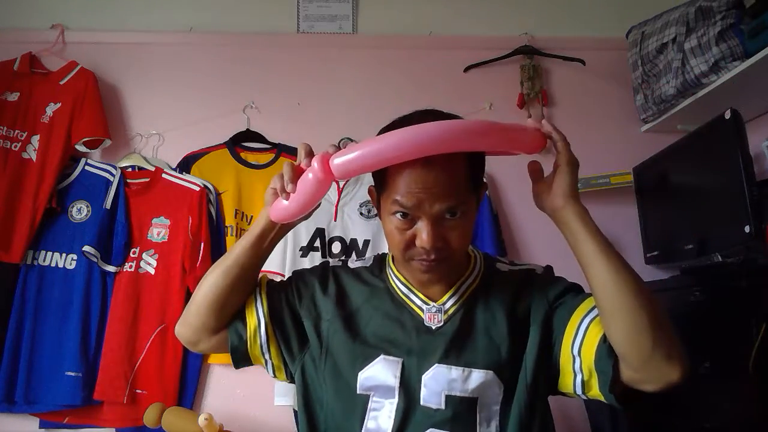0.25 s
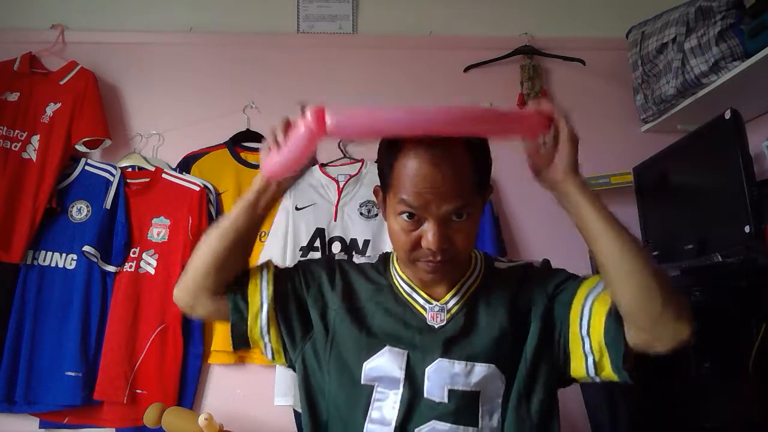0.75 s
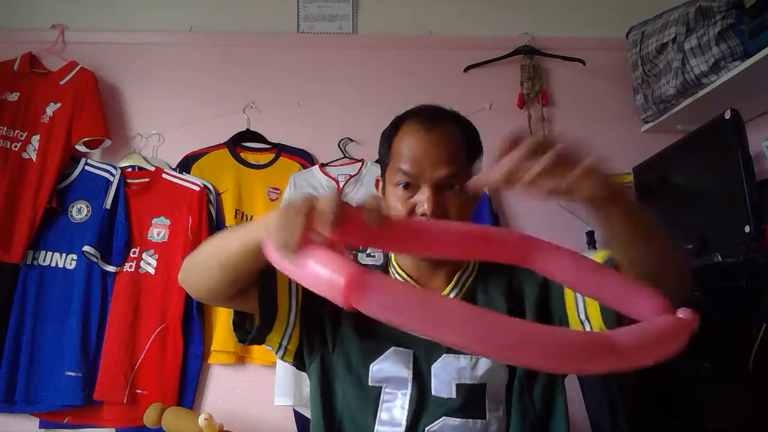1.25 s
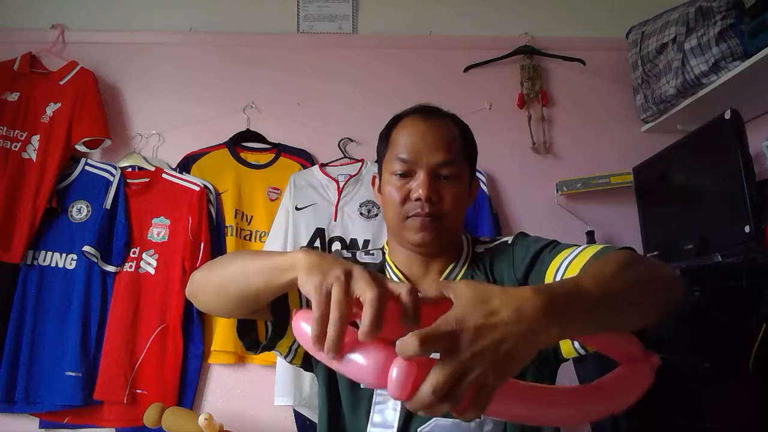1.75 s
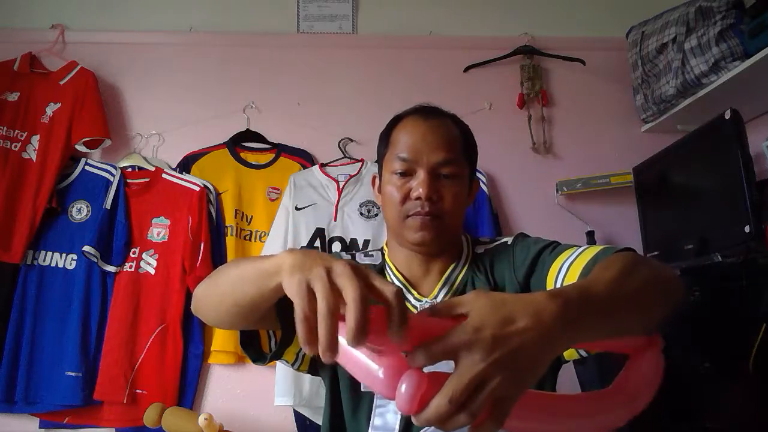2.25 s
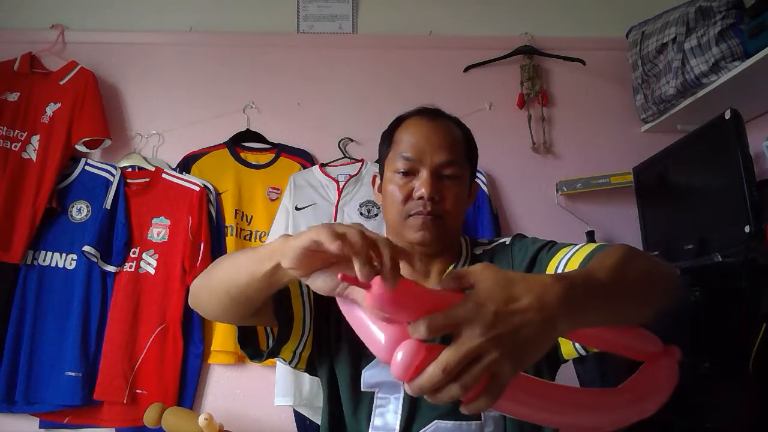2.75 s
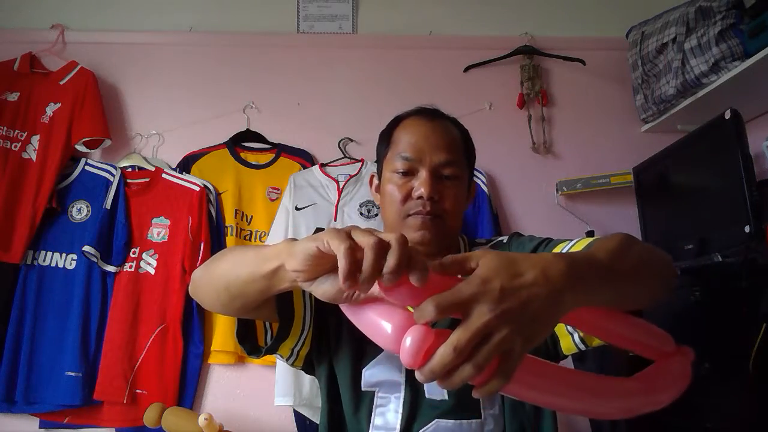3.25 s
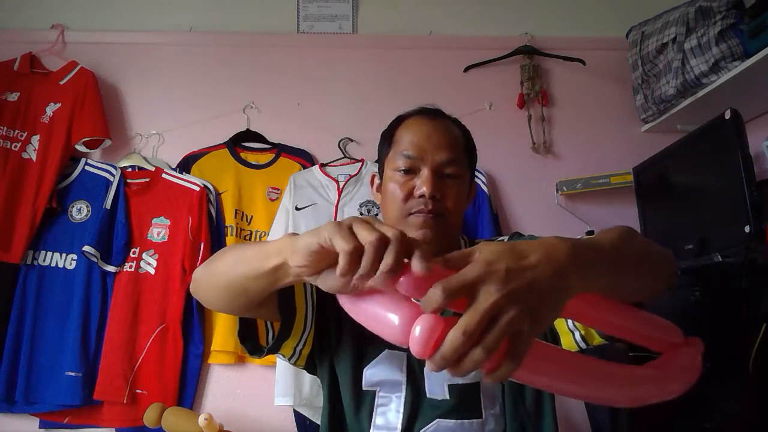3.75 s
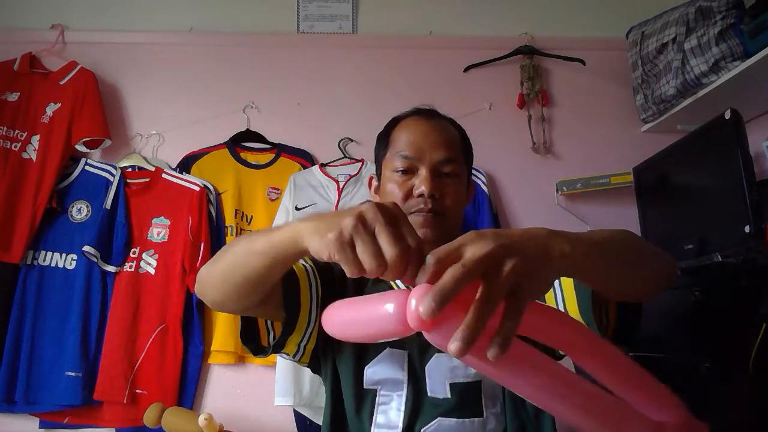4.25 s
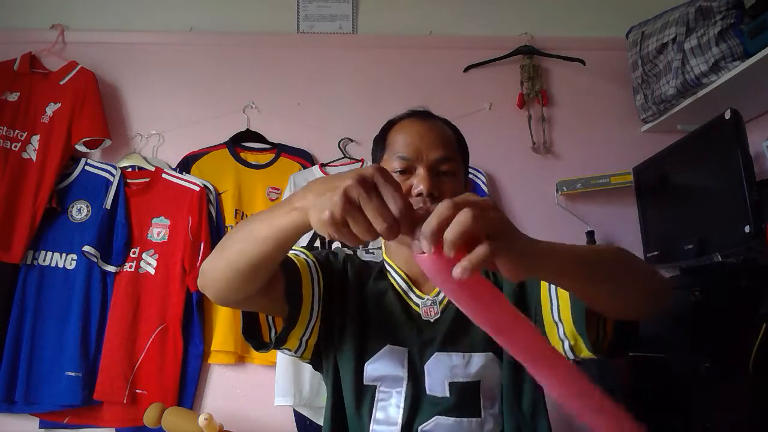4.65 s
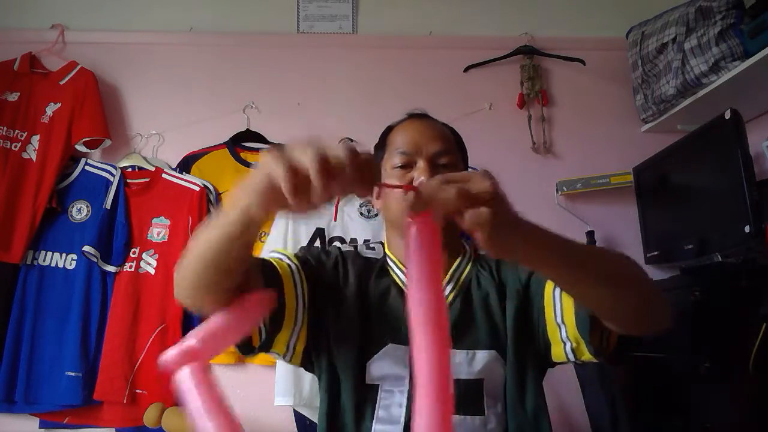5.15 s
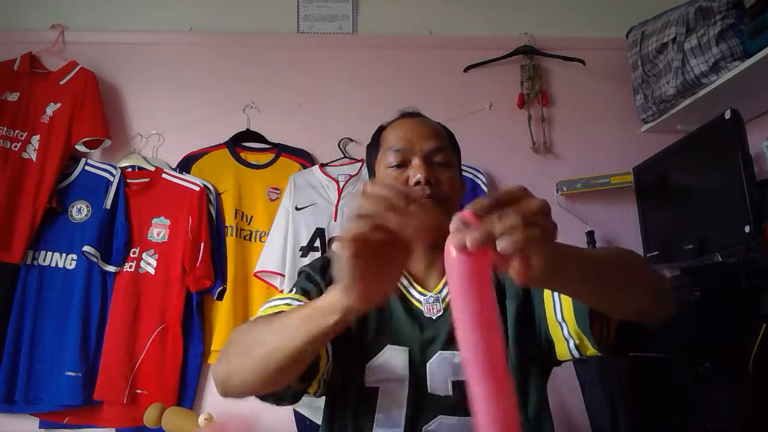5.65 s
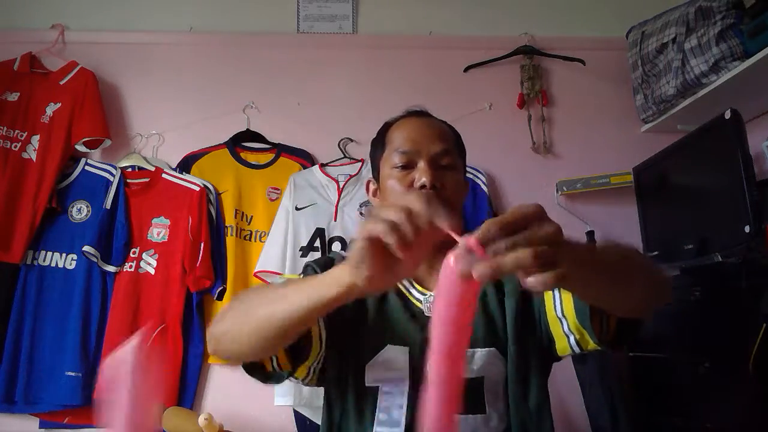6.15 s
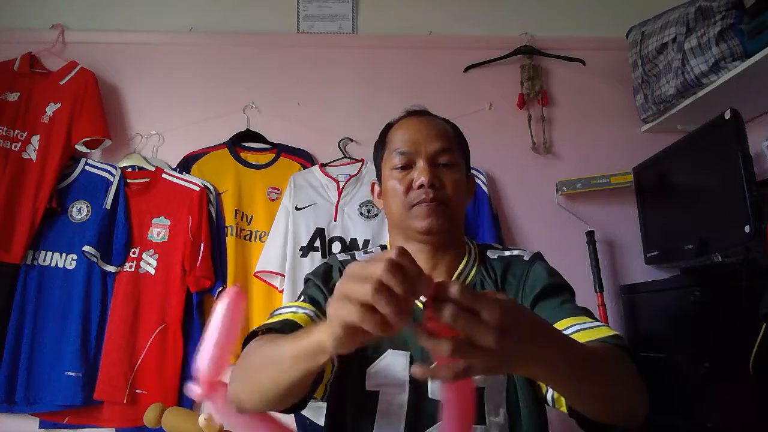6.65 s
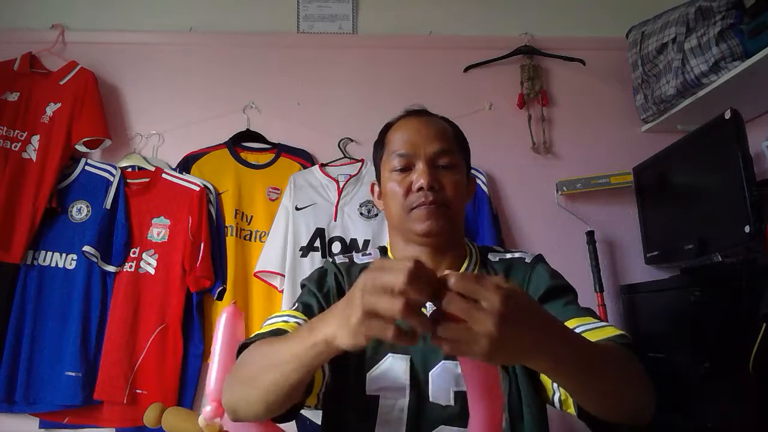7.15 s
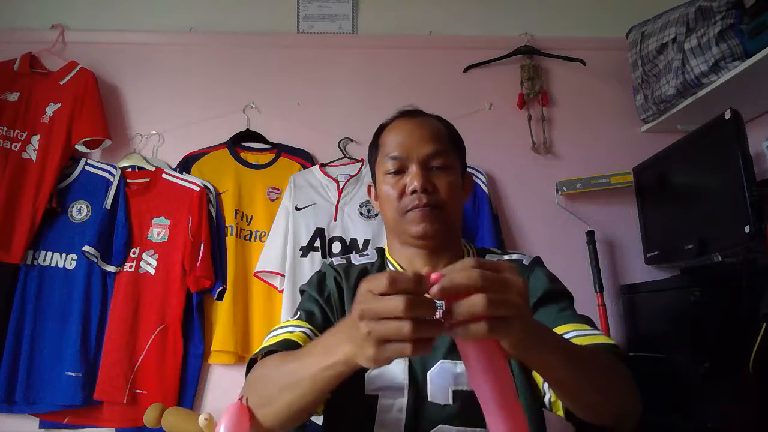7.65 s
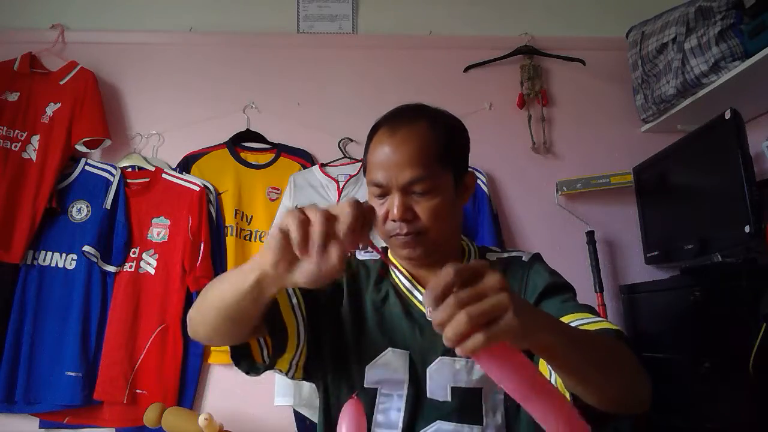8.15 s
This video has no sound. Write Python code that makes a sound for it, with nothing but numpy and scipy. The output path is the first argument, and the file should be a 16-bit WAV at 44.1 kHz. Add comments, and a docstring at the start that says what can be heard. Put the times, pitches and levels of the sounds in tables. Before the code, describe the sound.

A modelling balloon brushes off a man's hair with two main hissy swishes and bright snaps. Then hands twist and pinch it: short stuttering creaks, isolated rubbery snaps, soft fingertip friction and a few low thuds. One clear, brief squeak stands out around six seconds. Close stereo microphone, small room with short reflections and very faint low room noise.

```python
"""Crisp snaps and swishes open the scene, then dry creaks, squeaks and thin tones over soft fingertip friction and low thuds.
A latex balloon is slid off a head, then twisted and pinched by hand in a small room, close to a stereo microphone.
Latex sticks and slips: each slip thumps the air chamber, rings the taut skin and snaps; runs of slips make creaks.
The swishes over hair are coloured noise; the thin tones are nearly pure, wavering sines, one of them a faint low hum.
The air in the tube rings on briefly, held bubbles lend their resonances, and the room answers."""
import sys
import numpy as np
from scipy import signal
from scipy.fft import rfft, irfft, next_fast_len
from scipy.io import wavfile

SR = 44100
rng = np.random.default_rng(int(sys.argv[2]) if len(sys.argv) > 2 else 0)


def file_out(sig):
    """Save sig as 16-bit WAV at sys.argv[1]."""
    # one column per channel
    cols = np.atleast_2d(sig).T
    # limit, then scale
    lim = np.clip(cols, -1, 1)
    pcm = np.round(lim * 32767).astype(np.int16)
    wavfile.write(sys.argv[1], SR, pcm)


N = 369999
TIME = np.arange(N) / SR

# Colour of the still room. Each row: frequency in Hz, relative level in dB per Hz.
AIR_COLOUR = [(30, 14), (320, -5), (1500, -28), (16000, -26)]
# Decay of the room. Each row: frequency in Hz, t60 in seconds.
ROOM_DECAY = [(150, 0.27), (800, 0.17), (14000, 0.085)]
# Resonances of the air in the tube. Each row: frequency in Hz, relative level in dB, t60 in seconds.
TUBE_MODES = [(338, 4, 0.27), (468, -1.5, 0.22), (881, -0.5, 0.047), (1442, -9.5, 0.034)]
# Low thuds of the hands on the balloon. Each row: start in seconds, pitch in Hz, level in dB.
HAND_THUDS = [(0.0, 201.5, -30.5), (4.276, 107, -31.5), (4.419, 113, -41), (6.47, 182, -29),
              (6.54, 58.3, -42), (7.09, 153, -36.5), (7.152, 148.5, -37.5)]
# Swishes over hair. Each row: loudest moment in seconds, half length in seconds, level in dB.
HAIR_SWISHES = [(0.029, 0.098, -21), (0.258, 0.073, -35.5), (0.587, 0.052, -35), (0.816, 0.063, -22.5),
                (1.05, 0.052, -33.5)]
# Colour of the swishes. Each row: frequency in Hz, relative level in dB per Hz.
SWISH_COLOUR = [(60, 3), (190, -14.5), (700, -28.5), (1800, -9), (7000, -10), (10000, -5.5), (16000, -3)]
# Short squeaks and one faint low hum. Each row: loudest moment in seconds, half length in seconds,
# centre pitch in Hz, level in dB.
THIN_TONES = [(0.895, 0.03, 1086, -50), (2.05, 0.45, 134.4, -53), (2.355, 0.022, 1220, -44),
              (4.036, 0.01, 2510, -36), (4.862, 0.066, 1220, -49), (2.094, .006, 2000, -38),
              (3.868, .017, 1520, -52), (6.068, .01, 1450, -15), (7.033, .007, 2250, -42)]
# Holds of the hands, each closing off one bubble. Each row: start in seconds, end in seconds,
# centre chamber pitch in Hz, snap level in dB relative to the skin, relative level of creeping fingertips in dB.
HAND_HOLDS = [(0, 0.268, 1050, -3.5, -33.5), (0.682, 1.08, 416, -1.5, -53), (1.412, 1.669, 470, -5, -51.5),
              (1.666, 1.91, 860, -6.5, -42.5), (1.88, 2.117, 540, 1.5, -44.5), (2.12, 2.768, 744, -1, -47),
              (2.84, 2.978, 920, -2, -32.5), (3.06, 3.43, 710, -11.5, -57.5), (3.483, 3.71, 870, -17, -37),
              (3.773, 3.904, 750, -11, -47.5), (3.884, 4.285, 780, -8, -36), (4.27, 4.65, 380, 2, -44.5),
              (4.673, 5.216, 613, -3.5, -45), (5.247, 5.457, 386, 4, -43.5),
              (5.521, 5.605, 606, -28, -32.5), (5.871, 6.01, 480, -9.5, -38), (6.014, 6.135, 810, 0, -34.5),
              (6.194, 6.393, 690, -4.5, -33.5), (6.415, 6.545, 570, -4, -35.5),
              (6.608, 7.03, 555, 6, -52.5), (7.062, 7.188, 710, -16, -49.5), (7.372, 7.71, 1004, -2.5, -48),
              (7.82, 7.9, 585, -20, -59), (7.95, 8.31, 1080, -6.5, -43)]
# Colour of the creeping fingertips. Each row: frequency in Hz, relative level in dB per Hz.
FINGER_COLOUR = [(120, -3.5), (350, -6.5), (900, -11.5), (2200, -8.5), (5000, -13), (15000, -13.5)]
# Lightly held bubbles ringing with the slips. Each row: start in seconds, end of the drive in seconds,
# centre resonance in Hz, level in dB.
BUBBLE_RINGS = [(1.669, 1.808, 952, -33.5), (1.759, 1.884, 351, -39), (1.882, 1.92, 476, -29),
                (1.916, 1.957, 357, -27), (2.273, 2.325, 2600, -53), (2.53, 2.533, 636, -20),
                (2.687, 2.711, 723, -30.5), (3.35, 3.654, 1896, -45.5), (5.118, 5.206, 4460, -41),
                (5.137, 5.223, 2920, -41.5), (5.21, 5.273, 3400, -50), (6.247, 6.313, 2080, -29.5),
                (6.533, 6.58, 1990, -34.5), (6.606, 6.68, 2300, -37.5), (7.381, 7.41, 3750, -34),
                (7.95, 7.975, 2450, -35.5)]
# Single slips as a finger or a twist lets go. Each row: time in seconds, centre skin pitch in Hz,
# chamber level in dB, skin level in dB.
LONE_SLIPS = [(0.031, 3300, -22.5, -16.5), (0.119, 2000, -21.5, -24), (0.212, 3280, -29.5, -19),
              (1.001, 1800, -29.5, -28.5), (1.511, 2430, -25.5, -33), (1.589, 1010, -29, -61),
              (1.6684, 1560, -12.5, -14.5), (1.739, 1830, -16, -11.5), (1.9735, 1610, -27, -26),
              (2.0152, 1490, -18.5, -17.5), (2.146, 1330, -24.5, -41), (2.356, 2600, -31.5, -33),
              (2.3735, 2550, -31, -30), (2.398, 2590, -30, -28), (2.408, 2530, -26, -23.5),
              (2.655, 3930, -19, -17.5), (2.875, 2750, -22, -26), (3.1181, 2230, -19, -15),
              (3.271, 1880, -34, -52), (3.34, 1830, -36.5, -70), (3.417, 2100, -36.5, -60),
              (3.928, 2100, -52, -19), (3.944, 2050, -34, -16.5), (3.9786, 1900, -44, -24.5),
              (4.0648, 2420, -50, -22), (4.0733, 3600, -20, -12.5), (4.205, 2330, -22.5, -23),
              (4.281, 2070, -20.5, -21.5), (4.416, 1980, -14, -17), (4.668, 2160, -32, -13),
              (4.674, 1940, -26.5, -17.5), (5.084, 3900, -67, -37), (5.2928, 4850, -32, -25.5),
              (5.36, 1830, -23, -60), (5.4153, 4340, -26.5, -25), (5.865, 2100, -25, -38),
              (5.973, 2000, -57, -21.5), (6.3297, 4260, -52, -15), (6.3842, 2170, -36, -12.5),
              (6.9867, 6040, -27, -27), (7.033, 2100, -33.5, -57.5), (7.0897, 1605, -21.5, -17),
              (7.152, 1720, -22, -17.5), (7.4596, 4320, -31, -22), (7.5488, 2200, -16, -8),
              (7.7023, 2070, -54, -24.5), (7.862, 890, -21, -28.5), (7.983, 3610, -32, -9.5),
              (8.004, 2470, -14.5, -11), (8.173, 3200, -31, -23)]
# Twists that creak. Each row: start in seconds, end in seconds, middle rate in slips per second,
# centre skin pitch in Hz, chamber level in dB, skin level in dB, swell from start to end in dB, unevenness 0-1.
TWIST_CREAKS = [(0.712, 0.791, 145, 1810, -44, -48.5, -8, 0.11),
                (1.624, 1.658, 380, 1840, -34, -32.5, -4, 0.35),
                (1.681, 1.801, 220, 1850, -29.5, -26.5, 1, 0.33),
                (1.795, 1.891, 150, 1850, -33, -37.5, -7.5, 0.21),
                (1.901, 1.958, 260, 2200, -22, -26, 3, 0.16),
                (1.988, 1.997, 233, 1780, -19.5, -21.5, -1, .01),
                (2.128, 2.185, 200, 2000, -42.5, -40.5, -6.5, 0.26),
                (2.278, 2.314, 173, 2670, -42, -41.5, 1, 0.28),
                (2.417, 2.464, 230, 2340, -30, -31.5, 1, 0.34),
                (2.525, 2.546, 178, 2260, -27.5, -30, -9, 0.14),
                (2.599, 2.645, 240, 2390, -31, -26, -2.5, 0.18),
                (2.687, 2.749, 139, 2900, -31.5, -37, -7.5, 0.16),
                (2.851, 2.884, 125, 2880, -37, -44, 6, 0.17),
                (2.888, 2.911, 420, 1750, -21.5, -20.5, 0, 0.17),
                (2.913, 3.012, 129, 2270, -35.5, -33.5, -14, 0.08),
                (3.371, 3.526, 136, 2060, -50, -46.5, 9.5, 0.2),
                (3.586, 3.654, 160, 2150, -37, -34.5, -1, 0.26),
                (3.694, 3.73, 520, 1640, -25, -22, -10, 0.03),
                (4.0792, 4.127, 212, 2110, -30, -15.5, -1, 0.14),
                (4.132, 4.196, 100, 2150, -50.5, -27, -11, 0.07),
                (4.675, 4.701, 225, 2170, -37, -24, -6.5, 0.07),
                (4.796, 4.858, 237, 1920, -42, -39, 4, 0.26),
                (4.942, 4.998, 143, 2800, -47, -39, -13, 0.24),
                (5.13, 5.208, 104, 2800, -51.5, -48, 3.5, 0.09),
                (5.227, 5.257, 111, 3520, -36.5, -46.5, -5, 0.2),
                (5.53, 5.584, 171, 1740, -34, -29, 4, 0.17),
                (6.004, 6.045, 155, 1580, -38, -30.5, 4.5, 0.31),
                (6.0314, 6.057, 550, 2060, -25.5, -16, 0, 0.05),
                (6.058, 6.078, 750, 1880, -45.5, -15.5, -5.5, 0),
                (6.185, 6.22, 218, 2280, -39.5, -31.5, -2.5, 0.28),
                (6.238, 6.328, 300, 2000, -35.5, -30, 3, 0.24),
                (6.452, 6.508, 280, 2210, -27, -26.5, 1, 0.21),
                (6.527, 6.591, 244, 2320, -47, -31.5, -11, 0.27),
                (6.615, 6.69, 490, 2900, -85.5, -35, -6.5, 0.26),
                (6.74, 6.785, 450, 2980, -40.5, -35.5, 2, 0.37),
                (6.85, 6.876, 154, 3500, -35, -48, 7.5, 0.3),
                (7.407, 7.503, 177, 2760, -45, -32, 2.5, 0.24),
                (7.69, 7.745, 185, 3760, -53.5, -43.5, -3, 0.22),
                (7.961, 7.988, 420, 2920, -68, -37.5, 6.5, 0.32),
                (7.996, 8.031, 454, 2500, -26, -26, -10.5, 0.3),
                (8.049, 8.073, 306, 2880, -33, -27, 9, 0.2),
                (8.11, 8.149, 390, 2750, -42.5, -35.5, 3, 0.26),
                (8.224, 8.273, 86, 2350, -34.5, -28, -6, 0.13)]


def undb(db):
    """Turn decibels into gain."""
    return 10 ** (np.asarray(db) / 20)


def unit(x):
    """Scale a sound to rms 1."""
    return x / np.sqrt(np.mean(x ** 2))


def band(x, lo_hz, hi_hz, order=2):
    """Band-pass a sound without looking ahead."""
    edges = [lo_hz, min(hi_hz, SR / 2 - 1000)]
    return signal.sosfilt(signal.butter(order, edges, "band", fs=SR, output="sos"), x)


def colour(x, points):
    """Multiply the spectrum by a curve through (Hz, dB) points, then scale to rms 1."""
    hz, db = np.transpose(points)
    size = next_fast_len(N, real=True)
    bins = np.maximum(np.fft.rfftfreq(size, 1 / SR), 1)
    curve = undb(np.interp(np.log(bins), np.log(hz), db))
    return unit(irfft(rfft(x, size) * curve, size)[:N])


def add(out, sound, start_s):
    """Mix a sound in at a time."""
    i = max(int(start_s * SR), 0)
    out[i:i + len(sound)] += sound[:max(N - i, 0)]


def air(level_db=-63, side_db=-13):
    """Faint room noise, mostly a low rumble, with a weaker part opposite in the two channels."""
    mid, side = (undb(level_db) * colour(rng.standard_normal(N), AIR_COLOUR) for _ in range(2))
    return mid + undb(side_db) * side * np.array([[1], [-1]])


def echoes(early_db=-9, early_t60_s=0.088, late_db=-11, apart_hz=2200):
    """Scatter from body and desk, then the walls; the close ports hear mainly the treble differently."""
    t = np.arange(SR // 2) / SR
    bins = np.fft.rfftfreq(len(t), 1 / SR)
    hz, t60 = np.transpose(ROOM_DECAY)
    mid, side = rfft(rng.standard_normal((2, len(t))))
    alike = np.exp(-(bins / apart_hz) ** 2)
    sides = np.array([[1], [-1]])
    field = mid * np.sqrt((1 + alike) / 2) + sides * side * np.sqrt((1 - alike) / 2)
    late = 0
    # crossfading bands, each with its own decay
    for share, decay in zip(np.eye(len(hz)), t60):
        weight = np.interp(np.log(bins + 1), np.log(hz), share)
        late = late + irfft(field * weight, len(t)) * np.exp(-np.log(1000) * t / decay)
    late = late * (t > .008)
    # the same noise reversed in time serves as a second, earlier pattern
    early = irfft(field, len(t))[:, ::-1] * np.exp(-np.log(1000) * t / early_t60_s) * (t > .001)
    return (undb(early_db) * unit(early) + undb(late_db) * unit(late)) / np.sqrt(len(t))


def room(x, left_lag=0.89, turns_per_s=0.3986):
    """Direct sound and echoes; as the balloon turns, it throws its sound along other paths."""
    turn = 2 * np.pi * turns_per_s * TIME
    wet = 0
    for share in (np.cos(turn), np.sin(turn)):
        wet = wet + signal.oaconvolve((x * share)[None], echoes(), axes=1)[:, :N]
    # the left port lies a fraction of a sample further away
    size = next_fast_len(N, real=True)
    delay = np.exp(-2j * np.pi * np.fft.rfftfreq(size) * left_lag)
    left = irfft(rfft(x, size) * delay, size)[:N]
    return np.array([left, x]) + wet


def shifting(x, decay_s, low_hz, rate=14, size=512, count=6):
    """Short echoes whose paths keep changing as the balloon turns and bends."""
    lag = np.arange(size) / SR
    out = 0
    for _ in range(count):
        echo = band(rng.standard_normal(size) * lag * np.exp(-lag / decay_s), low_hz, SR, order=1)
        # each path glides between normal and flipped polarity, with a new draw rate times a second
        share = np.interp(TIME * rate, np.arange(size), rng.choice([-1, 1], size))
        out = out + share * signal.oaconvolve(x, echo / np.linalg.norm(echo))[:N]
    return out / np.sqrt(count)


def ports(pair, side_db=-6):
    """Treble scatters off the moving hands, with opposite sign at the two ports."""
    scatter = shifting(pair[1], decay_s=0.00086, low_hz=3500)
    return pair + undb(side_db) * scatter * np.array([[1], [-1]])


def tube(x, ring_db=-2, low_hz=230):
    """The air column picks out its resonances and rings on; a thin balloon radiates little bass."""
    t = np.arange(SR // 2) / SR
    ring = 0
    for hz, db, t60 in TUBE_MODES:
        decay = np.log(1000) / t60
        mode = np.exp(-decay * t) * np.cos(2 * np.pi * hz * t)
        ring = ring + undb(db) * 2 * decay / SR * mode
    return band(x, low_hz, 11000, order=1) + undb(ring_db) * signal.fftconvolve(x, ring)[:N]


def bumps(rise_s=0.0091, rough=0.61):
    """A hand knocks or shoves the whole balloon: a low sine and noise around it swell and die as a soft thud."""
    out = np.zeros(N)
    t = np.arange(SR // 4) / SR
    for start, hz, db in HAND_THUDS:
        rumble = unit(band(rng.standard_normal(len(t)), hz / 2, 2 * hz))
        sway = np.sin(2 * np.pi * hz * t) + rough * rumble
        add(out, undb(db) * t / rise_s * np.exp(1 - t / rise_s) * sway, start)
    return out


def slide(grain_db=3):
    """Hairs brush the latex: a dense, slightly grainy hiss that swells and fades with each swish."""
    # the grain level is redrawn every 20 samples
    grain_level = np.repeat(rng.standard_normal(N // 20 + 1), 20)[:N]
    grains = rng.standard_normal(N) * undb(grain_db * grain_level)
    speed = sum(undb(db) * np.exp(-((TIME - centre) / half) ** 2) for centre, half, db in HAIR_SWISHES)
    return speed * colour(grains, SWISH_COLOUR)


def squeak(half, hz, db, waver, waver_rate=160, octave_db=-13):
    """An almost pure tone that swells, wavers, sags as much as it wavers, and dies."""
    t = np.arange(-2 * half, 2 * half, 1 / SR)
    drift = np.interp((t - t[0]) * waver_rate, np.arange(512), rng.standard_normal(512))
    phase = 2 * np.pi * np.cumsum(hz * np.exp(waver * (drift - t / half))) / SR
    voice = np.sqrt(2) * (np.sin(phase) + undb(octave_db) * np.sin(2 * phase))
    return undb(db) * np.exp(-(t / half) ** 2) * voice


def tones(waver=0.018, rough_s=0.021):
    """Thin tones; those with a half length above rough_s waver less in pitch the longer they are."""
    out = np.zeros(N)
    for centre, half, hz, db in THIN_TONES:
        add(out, squeak(half, hz, db, waver * min(rough_s / half, 1)), centre - 2 * half)
    return out


def pressure(attack_s=0.022, release_s=0.035):
    """The fingers close on the latex, hold, and ease off; the firmest hold counts."""
    holds = []
    for start, end, _, _, db in HAND_HOLDS:
        closing = np.clip((TIME - start) / attack_s, 0, 1)
        easing = np.exp(-np.maximum(TIME - end, 0) / release_s)
        holds.append(undb(db) * closing * easing)
    return np.max(holds, axis=0)


def creep(gain_db=-2, rate=420, spread_db=4.5, smear_s=.0028, rub=0.017, grip_db=5, grip_rate=60):
    """Fingertips creep in tiny random slips over a soft rub, with an ever-changing grip."""
    size_db = spread_db * np.minimum(rng.exponential(size=N), 4)
    ticks = (rng.random(N) < rate / SR) * undb(size_db)
    # each tick fades over smear_s
    contact = signal.lfilter([1], [1, -np.exp(-1 / (smear_s * SR))], ticks) + rub
    grip = undb(grip_db * np.interp(TIME * grip_rate, np.arange(SR), rng.standard_normal(SR)))
    return undb(gain_db) * pressure() * grip * colour(contact * rng.standard_normal(N), FINGER_COLOUR)


def rings(friction, cycles=2.13, waver=.028, waver_rate=50, size=1024):
    """Friction sets a bubble's resonance swinging for a few cycles; its pitch drifts as the fingers squeeze."""
    out = np.zeros(N)
    for start, end, hz, db in BUBBLE_RINGS:
        push = friction[int(start * SR):int(end * SR)]
        push = np.pad(push * signal.windows.tukey(len(push), .3), (0, size))
        drift = np.interp(TIME[:len(push)] * waver_rate, np.arange(size), rng.standard_normal(size))
        turn = np.exp(2j * np.pi * np.cumsum(hz * np.exp(waver * drift)) / SR)
        pole = np.exp(-hz / (cycles * SR))
        # smooth the push in a frame that turns with the drifting pitch, then turn it back
        swing = np.real(turn * signal.lfilter([1], np.poly([pole, pole]), push / turn))
        add(out, undb(db) * swing * np.sqrt((end - start) * SR / np.sum(swing ** 2)), start)
    return out


def grip_at(time_s):
    """Chamber pitch and relative snap level of the hold nearest to a moment."""
    nearest = min(HAND_HOLDS, key=lambda grip: max(grip[0] - time_s, time_s - grip[1]))
    start, end, chamber_hz, snap_db, _ = nearest
    return chamber_hz, snap_db


def release(times, force, span_s, chamber_hz, skin_hz, levels_db, scatter, snap_s, chamber_cycles=0.72,
            skin_cycles=1.0, overtone=1.572, overtone_db=-7, flutter_db=-8, click=1.9, size=512, count=64):
    """Slips excite chamber, skin and snap; the three levels are rms over span_s."""
    t = np.arange(size) / SR
    chance = rng.standard_normal((2 * count, 3))[:len(times)]
    grit = rng.standard_normal((2 * count, 2, size))[:len(times)]
    # the grip shifts, so each slip meets a slightly different tension
    pitches = np.array([chamber_hz, skin_hz, skin_hz * overtone]) * np.exp(scatter * chance)
    # cycles elapsed, one row per slip
    low, high, upper = pitches.T[:, :, None] * t
    chamber = band(np.sin(2 * np.pi * low) * np.exp(-low / chamber_cycles), 170, 4300)
    # the skin swings up within a cycle, rubber damps it fast, and it radiates little below its own pitch
    swing = high * np.exp(-high / skin_cycles)
    flutter = unit(band(grit[:, 0], 470, 5100))
    partials = np.sin(2 * np.pi * high) + undb(overtone_db) * np.sin(2 * np.pi * upper)
    skin = band(swing * (partials + undb(flutter_db) * flutter), 0.41 * skin_hz, 5300)
    # the contact tears loose with a click and a spray of tiny slips
    spray = grit[:, 1] * t / snap_s * np.exp(-t / snap_s)
    snap = band(spray - click * (t == 0), 4100, 16000)
    snap = signal.lfilter([1], [1, -.25], snap)
    place = ((times * SR).astype(int)[:, None] + np.arange(size)).ravel()
    out = 0
    for grains, db in zip((chamber, skin, snap), levels_db):
        train = np.bincount(place, (force[:, None] * grains).ravel())
        out = out + undb(db) * train * np.sqrt(span_s * SR / np.sum(train ** 2))
    return out


def slips(span_s=0.0018, lead_s=0.0028, lead_db=-15, settle_s=0.0052, settle_db=-11):
    """Lone releases of built-up tension: the latex starts to give, lets go, and settles."""
    out = np.zeros(N)
    force = undb([lead_db, 0, settle_db])
    for start, skin_hz, chamber_db, skin_db in LONE_SLIPS:
        chamber_hz, snap_db = grip_at(start)
        levels_db = chamber_db, skin_db, skin_db + snap_db
        times = np.array([0, lead_s, lead_s + settle_s * (.5 + rng.random())])
        slip = release(times, force, span_s, chamber_hz, skin_hz, levels_db, chamber_cycles=0.61,
                       skin_cycles=0.89, scatter=0.01, flutter_db=-4.0, snap_s=0.00014, count=2)
        add(out, slip, start - lead_s)
    return out


def creaks(uneven_db=9, speed_up=.35, arch_db=3, stutter=3.05, crisp_s=.0003, fray_s=0.0013,
           scatter=.05, wander=0.43, count=96):
    """Stick-slip trains: harder pulls slip louder and faster; unsteady contact scatters and frays the snaps."""
    out = np.zeros(N)
    for start, end, rate, skin_hz, chamber_db, skin_db, swell_db, uneven in TWIST_CREAKS:
        chamber_hz, snap_db = grip_at((start + end) / 2)
        levels_db = chamber_db, skin_db, skin_db + snap_db
        span = max(end - start, 1 / rate)
        timing, strength = rng.standard_normal((2, count))
        pull_db = swell_db * (np.minimum(np.arange(count) / (rate * span), 1) - .5)
        # seconds stuck before each next slip
        stuck = np.exp(uneven * timing) / (rate * undb(speed_up * pull_db))
        times = np.cumsum(stuck) - stuck
        # position from -1 at the start to 1 at the end
        along = np.minimum(2 * times / span - 1, 1)
        force = undb(swell_db * along / 2 - arch_db * along ** 2 + uneven_db * uneven * strength)
        # an unsteady contact catches again and gives a second slip, scaled by its unevenness
        times = np.append(times, times + stuck * rng.uniform(.2, 0.87, count))
        force = np.append(force, force * stutter * uneven)
        keep = times < span
        train = release(times[keep], force[keep], span, chamber_hz, skin_hz, levels_db,
                        scatter=scatter + wander * uneven, snap_s=crisp_s + fray_s * uneven, count=count)
        add(out, train, start)
    return out


def scene():
    """Friction passes through the balloon and, with swishes, tones and thuds, into the room."""
    friction = creaks() + slips() + creep()
    # waves return from the twists, so each bubble lends its own shifting resonances
    returned = friction + undb(-4) * shifting(friction, decay_s=.0009, low_hz=350)
    balloon = tube(returned + slide()) + rings(friction)
    return ports(room(balloon + tones() + bumps())) + air()


def record(dry, top_hz=16000):
    """The recorder tops out at full scale and cuts the highest treble."""
    treble_cut = signal.ellip(8, .2, 70, top_hz, fs=SR, output="sos")
    return signal.sosfilt(treble_cut, np.clip(dry, -1, 1))


dry = scene()
out = record(dry)
file_out(out)
```